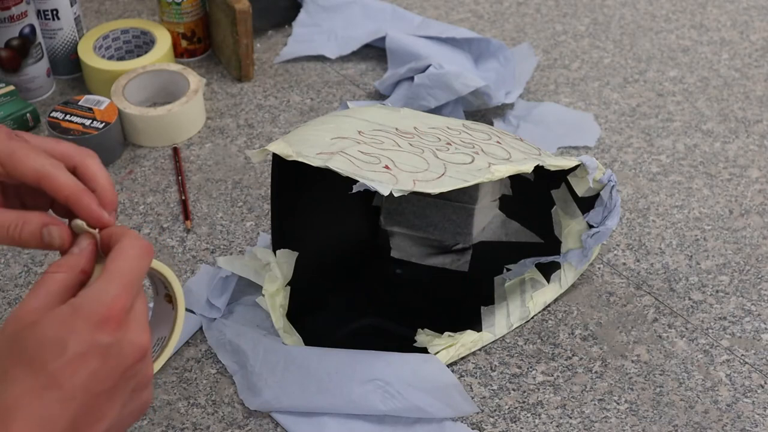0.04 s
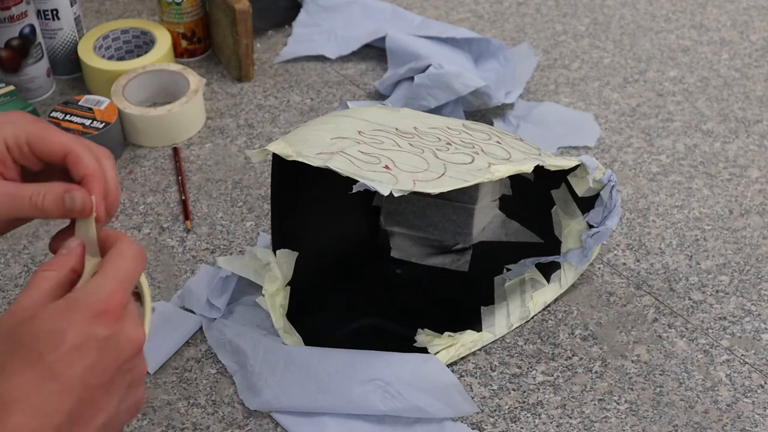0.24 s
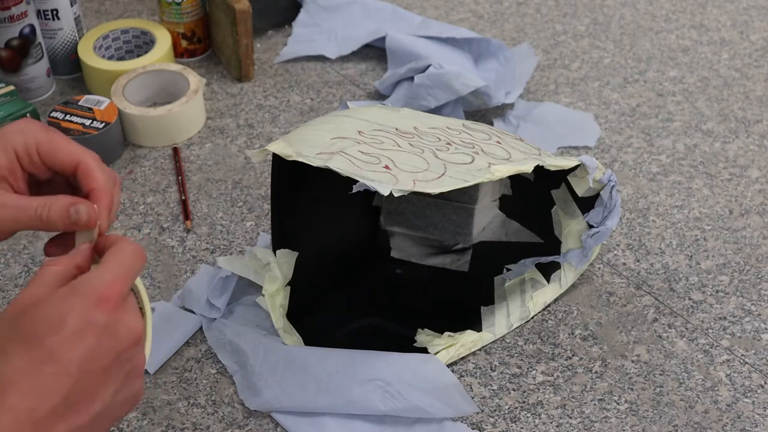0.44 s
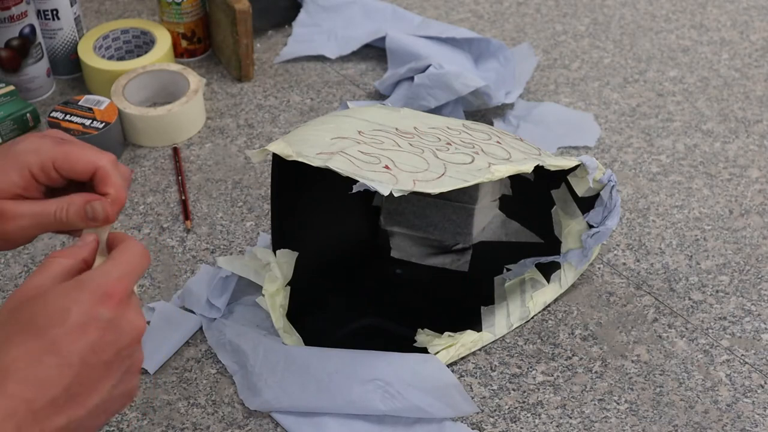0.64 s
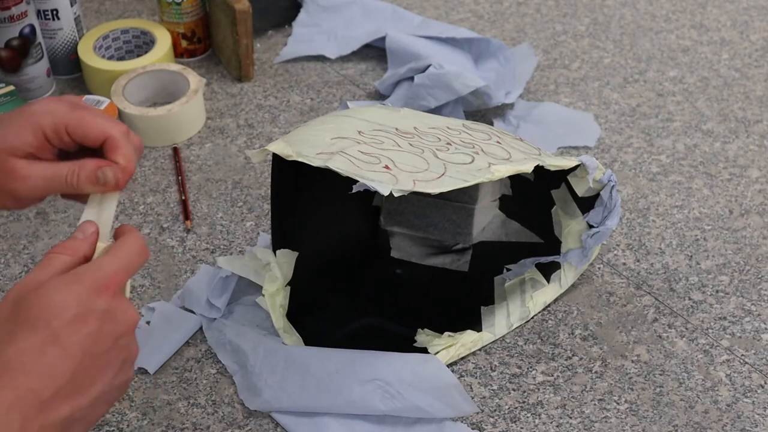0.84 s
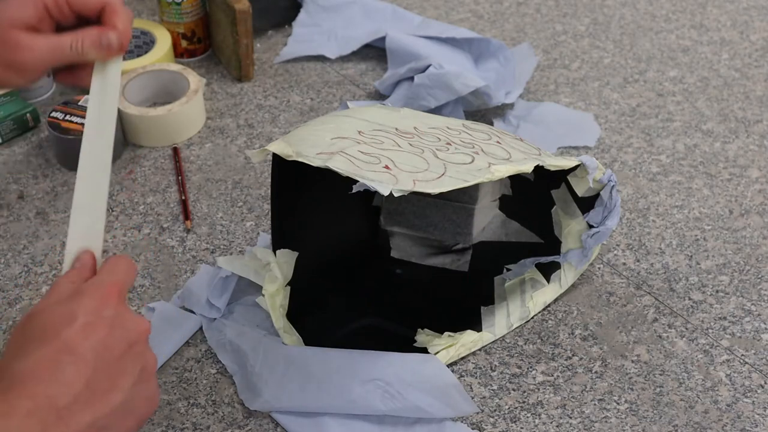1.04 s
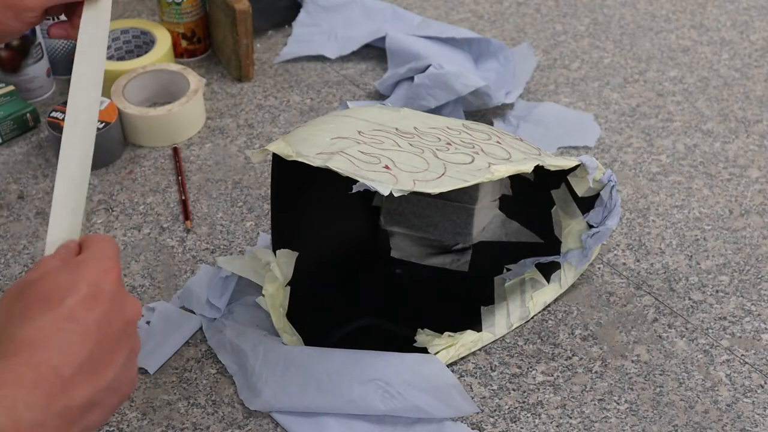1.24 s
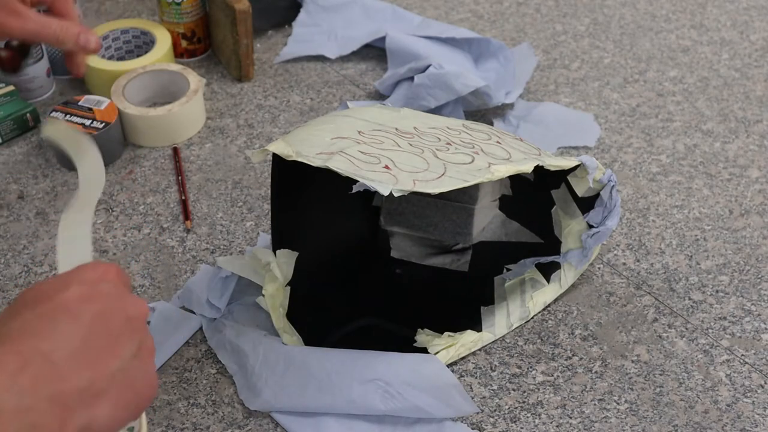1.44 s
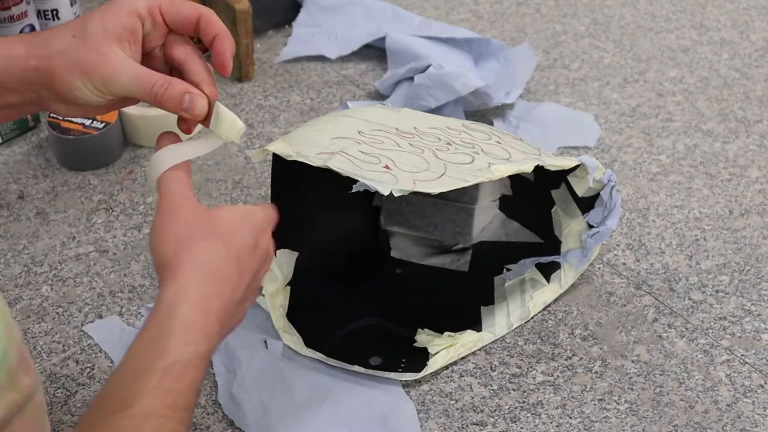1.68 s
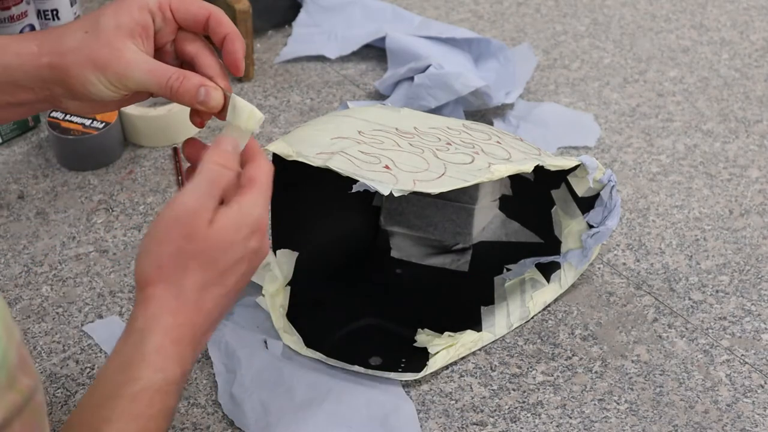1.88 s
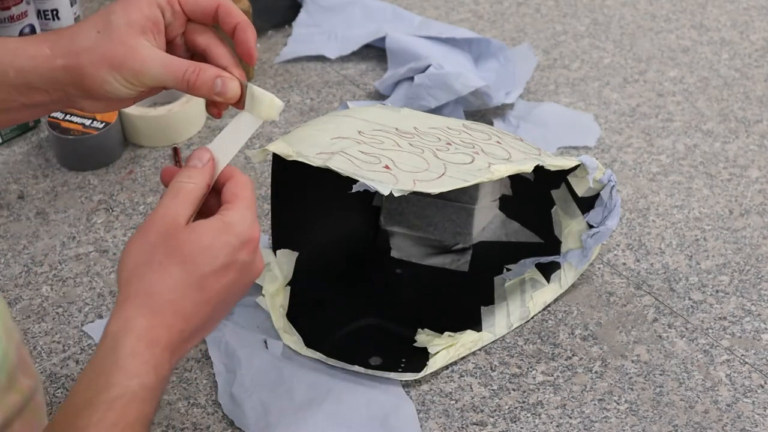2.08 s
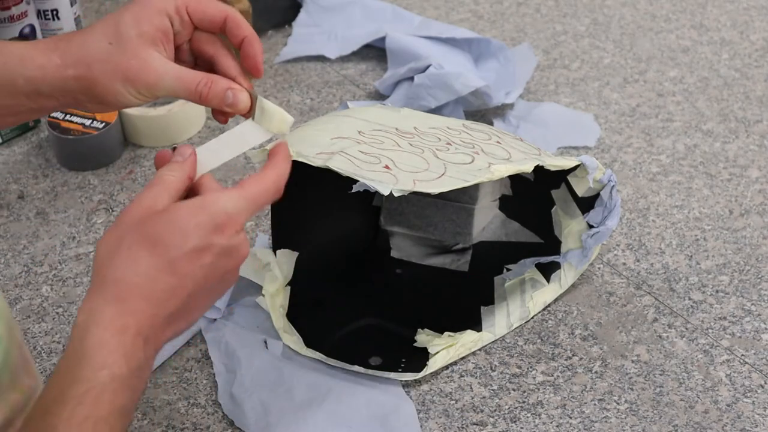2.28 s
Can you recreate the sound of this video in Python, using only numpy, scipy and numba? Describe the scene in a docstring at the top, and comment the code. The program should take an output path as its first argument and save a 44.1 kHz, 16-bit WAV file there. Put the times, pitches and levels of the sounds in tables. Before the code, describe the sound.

A short, harsh rip of paper tape peeling from its roll, then faint handling of the strip

```python
"""Masking tape is ripped off its roll in one quick pull, close by in a workshop, after some picking at it. The
glue lets go in a dense crackle of tiny clicks, with separate louder slips; paper and roll colour it. The taut
strip drones: resonances driven by the crackle, mostly sinking in pitch as the strip lengthens. Then the scene
changes: the room's ring stops, and fingers handle the loose tape over a low rumble. Fingers are filtered
clicks, the room is fading noise, and the background is steady coloured noise."""
import sys
import numpy as np
from scipy import signal
from scipy.fft import rfft, irfft
from scipy.io import wavfile
from scipy.ndimage import uniform_filter1d
from numba import njit

SR = 44100
rng = np.random.default_rng(int(sys.argv[2]) if len(sys.argv) > 2 else 0)


def output_pcm(signal):
    """Save a mono or channel-first signal as 16-bit PCM at the path in sys.argv[1].

    Samples are clipped to [-1, 1] before scaling.
    """
    pcm = np.clip(np.atleast_2d(signal).T, -1, 1) * 32767
    wavfile.write(sys.argv[1], SR, np.round(pcm).astype(np.int16))


N = 102091
T = np.arange(N) / SR  # time of every sample, in seconds

# Sudden slips of the glue: start_s, level_db
GLUE_SLIPS = [(0.9784, -11.5), (0.987, -5.5), (0.9929, -10), (1.0108, -5), (1.014, -0.5), (1.0287, -2),
              (1.037, -2.5), (1.0435, -5), (1.0475, -6), (1.0565, -4.5), (1.0723, 8), (1.0762, 8),
              (1.0881, 6.5), (1.0923, 6), (1.1028, 2.5), (1.1061, -3.5), (1.1216, -4), (1.1295, 2),
              (1.1371, 7), (1.1458, -1.5), (1.1566, 5.5), (1.165, 3.5), (1.1703, -5), (1.1799, 6),
              (1.182, 1), (1.1948, 5), (1.2071, -4), (1.209, 3), (1.223, 4), (1.2356, 0.5), (1.2484, -1),
              (1.2617, -2.5), (1.2744, -3.5), (1.2853, -20), (1.291, -4.5), (1.3061, -7.5), (1.3104, -7.5)]
# Loudness of the steady peeling between the slips: time_s, level_db
PEEL_LEVEL = [(.975, -51.5), (.99, -28), (1.003, -28.5), (1.024, -31.5), (1.042, -27), (1.062, -22.5),
              (1.085, -31.5), (1.112, -25.5), (1.135, -21.5), (1.16, -23.5), (1.195, -31.5), (1.25, -30.5),
              (1.312, -32), (1.325, -39)]
# Pitch and loudness of the taut strip: time_s, pitch_hz, level_db
STRIP_PATH = [(0.963, 1050, -59.5), (0.987, 1021, -32), (1.021, 1027, -27.5), (1.035, 727, -22.5),
              (1.054, 616, -27.5), (1.073, 506, -31), (1.097, 391.8, -25.5), (1.139, 308.4, -22.5),
              (1.183, 297, -32), (1.252, 237.5, -40), (1.312, 199.3, -56.5), (1.325, 221, -75)]
# Colour of the peeling with a short, half and fully drawn strip: frequency_hz, level_db (per Hz)
SHORT_TONE = [(450, -17.5), (900, -7), (1300, -6), (1620, -5.5), (1850, -11), (2200, -6), (3500, -11.5),
              (4700, -3.5), (5700, -0.5), (6700, -6.5), (8800, -3), (10200, -21.5), (12900, -10.5),
              (15700, -16.5)]
HALF_TONE = [(260, -24), (450, -11), (620, -7), (950, 4), (1300, -7.5), (1700, -1), (2500, -1.5),
             (3600, -2.5), (5400, -8.5), (8500, -2.5), (10200, -15.5), (13500, -14), (15700, -18)]
LONG_TONE = [(240, -20.5), (420, -7.5), (590, 0.5), (780, -7.5), (1000, -2.5), (1700, -8.5), (2400, -5.5),
             (4000, -1.5), (6200, -4), (8600, 2), (10200, -11), (12400, -5), (15700, -10.5)]
# Rings of the roll, relative to each other: pitch_hz, width_hz, level_db
ROLL_RINGS = [(1596, 80, -3), (1790, 80, -5), (2156, 27, -4), (3110, 62, -4), (3604, 37, -2.5),
              (5850, 100, -6), (6065, 130, -0.5), (6640, 23, -5)]
# Runs of near-regular slips locked to the strip: start_s, length_s, first_pitch_hz, level_db, top_hz
SQUAWK_RUNS = [(1.039, 0.033, 549, -21.5, 11000), (1.108, 0.026, 357.6, -22, 9000)]
# Loudness of the tape end as it slowly starts to lift: time_s, level_db
LIFT_LEVEL = [(.77, -73.5), (.84, -64.5), (.858, -52), (.925, -50), (.975, -37), (.995, -54.5)]
# Colour of that lifting: frequency_hz, level_db (per Hz)
LIFT_COLOUR = [(300, -26.5), (700, -10), (1200, -2), (3000, -8.5), (5500, -2), (8600, -1.5), (10200, -12.5),
               (13000, -7), (15700, -11.5)]
# Fingers rubbing and lifting tape: start_s, length_s, level_db
FINGER_RUBS = [(0.356, 0.088, -63), (0.434, 0.036, -58), (1.659, 0.05, -62), (1.69, .11, -76.5),
               (1.982, .1, -63.5), (2.096, 0.13, -66), (2.207, 0.086, -68)]
# Colour of the rubs: frequency_hz, level_db (per Hz)
RUB_COLOUR = [(1180, -40), (2000, -5.5), (2500, -8), (3560, -9.5), (4380, -10), (4980, -4.5), (7660, 0),
              (10400, -17.5), (13300, -8), (15600, -23.5)]
# Crinkles of the tape: start_s, level_db, pitch_hz, papery_body_level_db
TAPE_CRINKLES = [(.331, -43.5, 6500, -52), (0.351, -52, 4060, -36), (.4345, -31.5, 7440, -34.5),
                 (.447, -38, 7460, -38.5), (0.475, -41, 7910, -53), (.568, -38, 5100, -30.5),
                 (.909, -19, 6400, -42), (1.6779, -26, 7600, -40), (1.685, -45, 7030, -33),
                 (1.688, -45, 5020, -46), (2.055, -53.5, 6950, -30.5), (2.092, -39, 5500, -36),
                 (2.0986, -49, 1400, -35), (2.12, -39.5, 955, -48), (2.142, -39, 1090, -33),
                 (2.1607, -39.5, 5000, -28)]
# Colour of the papery body of a crinkle: frequency_hz, level_db (per Hz)
BODY_COLOUR = [(100, -23), (400, -4.5), (1000, 8), (1700, -4.5), (3000, -2.5), (8000, -11.5), (11000, -25),
               (16000, -28)]
# Time the room takes to fade by 60 dB: frequency_hz, fade_time_s
ROOM_FADE = [(200, 1.2), (660, 0.89), (1700, 0.76), (4500, 0.95), (8000, 0.54), (13000, 0.37)]
# Loudness of the room's tail: frequency_hz, level_db
ROOM_LEVEL = [(200, -25), (700, -16.5), (1700, -11), (4000, -12), (8500, -16), (10500, -13), (15000, -14)]
# Colour of the background before the break: frequency_hz, level_db (per Hz)
AIR_COLOUR = [(12, -55.5), (20, -16), (145, -0.5), (316, -6), (353, -16.5), (429, -8), (537, -16),
              (690, -9), (963, -22), (1050, -19), (1420, -23), (1830, -27), (15600, -34)]
# Colour of the low rumble after the break: frequency_hz, level_db (per Hz)
RUMBLE_COLOUR = [(12, -51), (20, -41), (93, -3), (149, -4.5), (186, -5), (299, -3), (363, -12), (429, -11),
                 (537, -21.5), (815, -21), (1240, -25), (1380, -27), (2560, -33.5), (6780, -35.5),
                 (15600, -40.5)]
# A faint ring dying away from the start: pitch_hz, width_hz, level_db
FADING_BANDS = [(359, 80, -57), (652, 90, -54.5), (1050, 390, -61), (1400, 540, -67.5)]

# One snap: length and strength of its grit, then its papery ring
SNAP_S, SNAP_GRIT = 0.0006, 0.26
SNAP_RING_HZ, SNAP_RING_WIDTH_HZ, SNAP_RING_DB = (2600, 8500), 900, -7.5
# Slips: rebound after this share of a strip period, and a shower of small strands
REBOUND_PERIODS, REBOUND_DB = 0.85, -2.5
SHOWER_DB, SHOWER_S = -1, 0.0026
STRANDS_PER_S, STRAND_SPREAD_DB = 5000, 3.5
ECHO_SHARE = 0.39  # share of the crackle that returns after each strip period
# Squawks: timing error in periods, share by which pitch falls, unevenness, fading time of each slip's smear
SQUAWK_JITTER, SQUAWK_SAG, SQUAWK_SPREAD_DB, SQUAWK_SMEAR_S = 0.005, 0.008, 2, 0.00056
# Strip: width as a share of the pitch, second and third partial, low push of the pull
STRIP_WIDTH, OVERTONES_DB = 0.69, (-23.5, -11.5)
THUMP_DB, THUMP_HZ = -31, 130
DRAWN_S = (1.055, 1.125, 1.25)  # times when the short, half and long colours hold
LOW_CUT_HZ, ROLL_DB = 230, -6
RUB_GRAINS_PER_S = 700
# Crinkles: width as a share of the pitch, fading time, first crack against the crackle
CRINKLE_WIDTH, CRINKLE_S, CRINKLE_SNAP_DB = 0.55, 0.002, -1
NEAR_DB, NEAR_S, NEAR_PER_S = -10, 0.006, 3000  # scatter from the floor and things close by
AIR_DB, RUMBLE_DB, FADING_DB_PER_S = -59, -55, 28
BREAK_S, CROSSFADE_S = 1.615, 0.005
CEILING, EDGE_HZ = 0.92, 15850  # soft limit of the level, top of the band


def rip():
    """The peeling shakes the paper, the roll and the strip, and each adds its own colour."""
    time, hz, db = np.transpose(STRIP_PATH)
    pitch = np.interp(T, time, hz)
    drive = peeling(pitch) + squawks()
    paper = np.zeros(N)
    # Blend from one colour to the next as the strip is drawn out.
    for share, tone in zip(np.eye(3), (SHORT_TONE, HALF_TONE, LONG_TONE)):
        paper += colour(drive * np.interp(T, DRAWN_S, share), tone)
    paper = filtered(paper, 2, LOW_CUT_HZ, "highpass")
    roll = sum(amp(ring_db) * resonate(paper, f, width) for f, width, ring_db in ROLL_RINGS)
    level = amp(np.interp(T, time, db, left=-140, right=-140))
    return paper + amp(ROLL_DB) * roll + strip(drive, pitch, level)


def peeling(pitch):
    """Steady crackle echoes along the strip; each slip adds a snap, its rebound and a shower of strands."""
    crackle = strands(N)
    echoes = unit(ECHO_SHARE ** np.arange(5))
    out = np.zeros(N)
    for k, share in enumerate(echoes):
        out += share * np.interp(T - k / pitch, T, crackle)
    out = evened(out) * level_curve(PEEL_LEVEL)
    t = T[:SR // 40]
    for start, db in GLUE_SLIPS:
        add(out, start, amp(db) * snap())
        rebound_s = start + REBOUND_PERIODS / np.interp(start, T, pitch)
        add(out, rebound_s, amp(db + REBOUND_DB) * snap())
        shower = unit(strands(len(t)) * np.exp(-t / SHOWER_S))
        add(out, start, amp(db + SHOWER_DB) * shower)
    return out


def snap(count=160):
    """One sharp crack has a gritty end and rings the paper briefly at a pitch of its own."""
    t = np.arange(count) / SR
    grit = SNAP_GRIT * rng.standard_normal(count) * np.exp(-t / SNAP_S)
    crack = unit((t == 0) + grit)
    hz = np.exp(rng.uniform(*np.log(SNAP_RING_HZ)))
    ring = np.cos(2 * np.pi * hz * t) * np.exp(-np.pi * SNAP_RING_WIDTH_HZ * t)
    return unit(crack + amp(SNAP_RING_DB) * unit(ring))


def strands(count, per_s=STRANDS_PER_S):
    """Glue strands snap at random: sparse clicks of uneven size and either sign."""
    size = amp(STRAND_SPREAD_DB * np.minimum(rng.exponential(1, count), 4))
    sign = rng.choice([-1., 1.], count)
    present = rng.random(count) < per_s / SR
    return evened(size * sign * present)


def squawks():
    """The slipping locks to the strip: about one slip per period gives a brief pitched squawk."""
    out = np.zeros(N)
    for start, length, hz, db, top_hz in SQUAWK_RUNS:
        t = np.arange(0, length, 1 / SR)
        late, size = rng.standard_normal((2, 40))
        at = np.arange(40) / hz
        at = at * (1 + SQUAWK_SAG * at / length / 2) + SQUAWK_JITTER * late / hz
        # Sinc pulses can be placed between two samples.
        pulses = amp(SQUAWK_SPREAD_DB * size) @ np.sinc((t - at[:, None]) * SR)
        pulses = filtered(pulses, 2, top_hz)
        # Smear each slip with a short random scatter whose spectrum is flat.
        spread = rfft(rng.standard_normal(256) * np.exp(-T[:256] / SQUAWK_SMEAR_S))
        scatter = irfft(spread / abs(spread))
        smeared = signal.lfilter(scatter, [1], pulses)
        swell = np.sqrt(np.sin(np.pi * t / length))
        add(out, start, amp(db) * evened(smeared * swell))
    return out


def strip(drive, pitch, level):
    """The peeling shakes the free strip, whose partials follow its changing pitch."""
    def steady(x):
        """Evens out loudness over short stretches."""
        return x / np.sqrt(abs(uniform_filter1d(x ** 2, size=900)) + 1e-14)

    shake = filtered(drive, 4, LOW_CUT_HZ, "highpass")
    partials = np.zeros(N)
    for number, db in enumerate((0, *OVERTONES_DB), start=1):
        partial = resonate(shake, number * pitch, STRIP_WIDTH * pitch, order=3)
        partials += amp(db) * steady(partial)
    thump = filtered(drive, 2, THUMP_HZ)
    return level * (partials + amp(THUMP_DB) * steady(thump))


def lifting():
    """Fine, even crackle as the glue first gives way."""
    return colour(strands(N), LIFT_COLOUR) * level_curve(LIFT_LEVEL)


def fingers():
    """Handling the tape gives soft grainy rubs and small crinkles with a pitched crack and papery body."""
    cracks, body, swell = np.zeros((3, N))
    for start, length, db in FINGER_RUBS:
        add(swell, start, amp(db) * np.sin(np.pi * np.arange(0, length, 1 / SR) / length))
    t = T[:SR // 40]
    for start, db, hz, body_db in TAPE_CRINKLES:
        crackle = unit(strands(len(t)) * np.exp(-t / CRINKLE_S))
        burst = unit(crackle + amp(CRINKLE_SNAP_DB) * (t == 0))
        crack = unit(resonate(burst, hz, CRINKLE_WIDTH * hz, order=2))
        add(cracks, start, amp(db) * crack)
        add(body, start, amp(body_db) * burst)
    rubs = swell * colour(strands(N, RUB_GRAINS_PER_S), RUB_COLOUR)
    return cracks + colour(body, BODY_COLOUR) + rubs


def workshop(x):
    """Direct sound, quick scatter from nearby things, and a tail of noise that fades at its own rate per band."""
    t = T[:SR]
    near = rng.choice([-1., 1.], SR) * (rng.random(SR) < NEAR_PER_S / SR)
    near = near * np.exp(-t / NEAR_S) * (t > 0.0005)
    hz, when, z = signal.stft(rng.standard_normal(SR), SR, nperseg=256)
    t60 = read(ROOM_FADE, hz)[:, None]
    fade = amp(read(ROOM_LEVEL, hz)[:, None] - 60 * when / t60)
    # The last factor keeps a tail's energy the same whether it is short or long.
    z = z * fade * np.sqrt(2 * np.log(1000) / t60 / SR)
    tail = signal.istft(z, SR, nperseg=256)[1][:SR] * np.minimum(t / 0.004, 1)
    return x + signal.fftconvolve(x, amp(NEAR_DB) * unit(near) + tail)[:N]


def fading_ring():
    """A few soft bands of noise die away at a steady rate."""
    bands = np.zeros(N)
    for hz, width, db in FADING_BANDS:
        bands += amp(db) * evened(resonate(rng.standard_normal(N), hz, width, order=2))
    return bands * amp(-FADING_DB_PER_S * T)


def background(tone, db):
    """Steady noise shaped to the given colour."""
    spectrum = rfft(rng.standard_normal(N)) * amp(read(tone, np.fft.rfftfreq(N, 1 / SR)))
    return amp(db) * evened(irfft(spectrum, N))


def amp(db):
    """Turns decibels into gain."""
    return 10 ** (np.asarray(db) / 20)


def level_curve(points):
    """Joins timed levels into a gain curve, near silence outside them."""
    return amp(np.interp(T, *np.transpose(points), left=-120, right=-120))


def evened(x):
    """Scales to an rms (average strength) of 1."""
    return x / np.sqrt(np.mean(x ** 2) + 1e-20)


def unit(x):
    """Scales to a total energy of 1."""
    return x / (np.linalg.norm(x) + 1e-12)


def read(points, hz):
    """Reads a table between its points on a log-frequency axis."""
    f, value = np.transpose(points)
    return np.interp(np.log(hz + 1), np.log(f + 1), value)


def add(mix, start, sound):
    """Mixes a sound in at a time in seconds."""
    part = mix[round(start * SR):][:len(sound)]
    part += sound[:len(part)]


def filtered(x, order, hz, kind="lowpass"):
    """Butterworth filter: cuts smoothly above (or below) a frequency."""
    return signal.sosfilt(signal.butter(order, hz, kind, fs=SR, output="sos"), x)


def colour(x, points, size=4096):
    """Filter of energy 1 with the given spectrum, responding only after its input (minimum phase)."""
    db = np.maximum(read(points, abs(np.fft.fftfreq(size, 1 / SR))), -100)
    log_gain = np.log(amp(db))
    taps = np.fft.ifft(np.exp(np.conj(signal.hilbert(log_gain)))).real[:size // 2]
    return signal.oaconvolve(x, unit(taps))[:len(x)]


def resonate(x, hz, width, order=1):
    """A resonance of gain 1: shift its pitch down to zero, smooth, and shift back up."""
    ones = np.ones(len(x))
    turn = np.exp(2j * np.pi * np.cumsum(hz * ones) / SR)
    keep = np.exp(-np.pi * abs(width) / SR) * ones
    z = x / turn
    for _ in range(order):
        z = smooth(z, keep)
    return 2 * (turn * z).real


@njit
def smooth(z, keep):
    """One-pole smoothing with a memory that may change."""
    out, last = np.empty_like(z), 0j
    for i in range(len(z)):
        last = keep[i] * last + (1 - keep[i]) * z[i] + 1e-18
        out[i] = last
    return out


def scene():
    """The rip and its room up to the break, then quiet handling over the rumble."""
    after = np.clip((T - BREAK_S) / CROSSFADE_S, 0, 1)
    hands = fingers()
    first = workshop(lifting() + rip() + hands * (1 - after))
    first = first + background(AIR_COLOUR, AIR_DB) + fading_ring()
    second = workshop(hands * after) + background(RUMBLE_COLOUR, RUMBLE_DB)
    return (first * (1 - after) + second * after)[None]


def record(dry):
    """The loudest snaps are softly rounded; then the highest treble is cut."""
    rounded = CEILING * np.tanh(dry / CEILING)
    band_limit = signal.firwin(1023, EDGE_HZ, window=("kaiser", 9), fs=SR)
    return signal.oaconvolve(rounded, band_limit[None], "same")


dry = scene()
out = record(dry)
output_pcm(out)
```